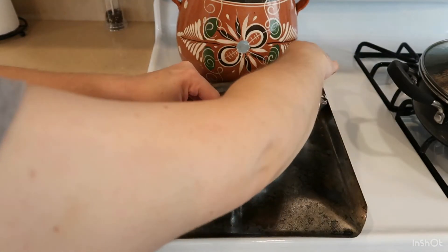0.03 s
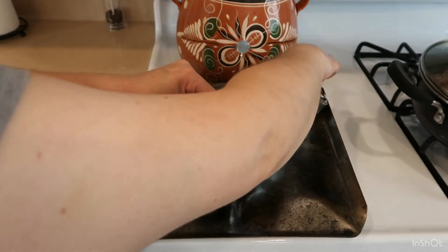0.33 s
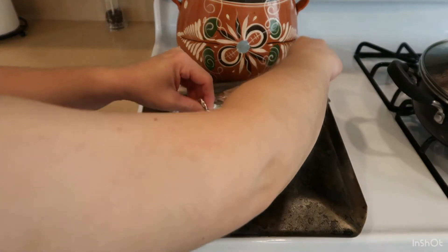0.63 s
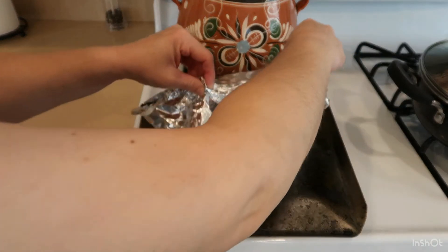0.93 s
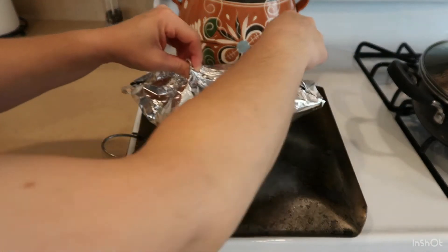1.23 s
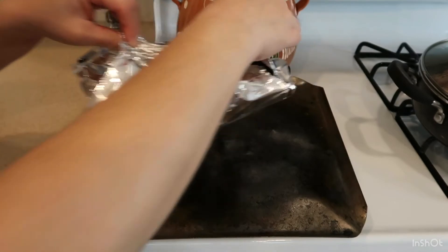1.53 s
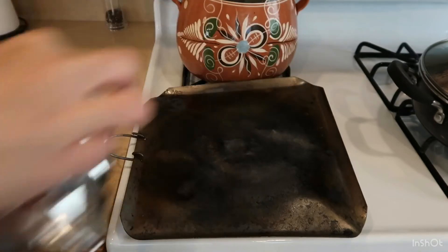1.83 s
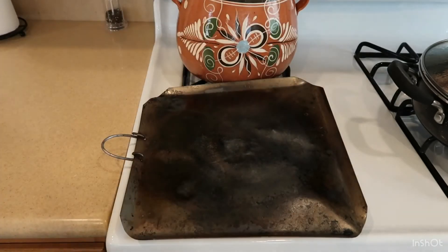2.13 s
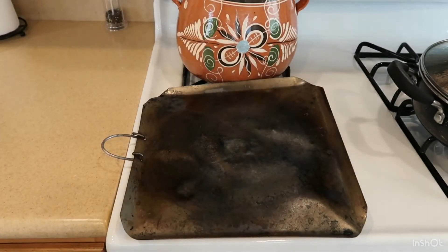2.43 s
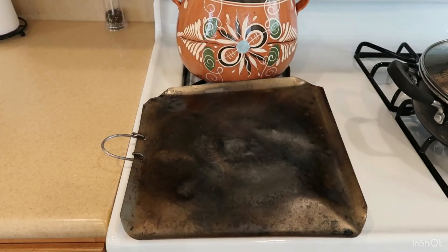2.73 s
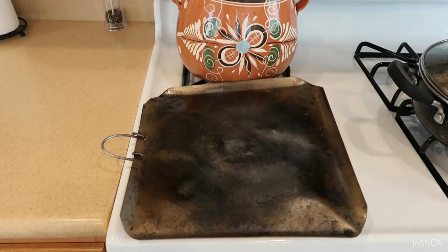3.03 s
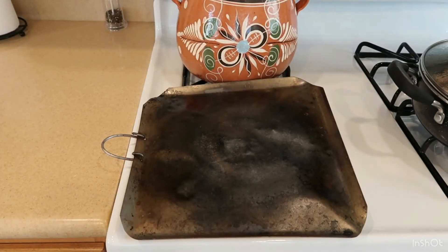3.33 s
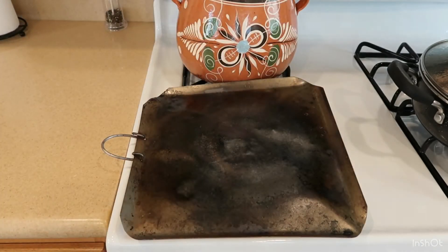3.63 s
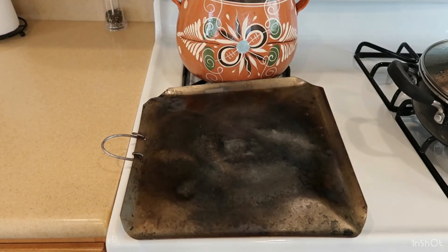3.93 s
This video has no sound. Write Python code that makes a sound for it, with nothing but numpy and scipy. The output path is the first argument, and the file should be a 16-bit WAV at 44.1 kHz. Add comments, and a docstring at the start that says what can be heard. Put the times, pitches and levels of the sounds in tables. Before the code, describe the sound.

Aluminium foil crackles and snaps close to the microphone as it is peeled off a griddle. It ticks lightly while carried aside, then rustles further off with a soft knock and a dull scrape. A kitchen appliance hums faintly throughout.

```python
"""A kitchen appliance hums from the start, and two close microphone ports pick up the scene.
For 1.75 s a crumpled sheet of aluminium foil is peeled off a griddle: its creases buckle in single
snaps over a dense crackle of tiny facets, and near 0.5 s a fold collapses. The sheet is then carried
aside, ticking lightly, and shivers after a jolt at 2.4 s. From 3 s it rustles further off, where the
room's reverberation is stronger, with a soft knock, one more tick and a dull scrape."""
import sys
import numpy as np
from scipy import signal
from scipy.fft import rfft, irfft, next_fast_len
from scipy.io import wavfile
from scipy.ndimage import map_coordinates

SR = 44100
rng = np.random.default_rng(int(sys.argv[2]) if len(sys.argv) > 2 else 0)


def master_out(mix):
    """Clip the mix to full scale and print it as 16-bit PCM to the path in sys.argv[1]."""
    frames = np.transpose(np.atleast_2d(mix))
    ceiling = np.clip(frames, -1, 1)
    pcm = np.round(ceiling * 32767).astype(np.int16)
    wavfile.write(sys.argv[1], SR, pcm)


N = 176400

# Harmonics of the appliance's mains and motor: harmonic number, relative level/dB
MAINS_HARMONICS = [(1, -71), (2, -44.5), (3, -51.5), (4, -48.5), (5, -53.5), (6, -55), (7, -60.5)]
MOTOR_HARMONICS = [(3, -49.5), (4, -49), (5, -52), (7, -60.5), (8, -59)]
# Spectrum of its air noise: f/Hz, relative level/dB
AIR_SPECTRUM = [(20, -7.5), (70, 0.5), (200, 2), (330, -1), (480, -3), (650, -11), (1200, -10.5),
                (1600, -19), (3000, -22.5), (6000, -31.5), (12000, -41), (15500, -54)]
# Stereo width of the air noise and of the echoes: f/Hz, side over mid/dB (before offset and cap)
AIR_WIDTH = [(60, -54), (130, -31), (300, -14), (800, -12), (1200, -14.5), (1800, -6.5), (3500, -4),
             (6000, 11), (12000, 14)]
ECHO_WIDTH = [(100, -26), (500, -17), (1200, -21), (1900, -22), (3000, -12), (5000, -5), (8000, 0),
              (14000, 3)]
# Direct sound at the two ports: f/Hz, phase lead of the left/rad
PORT_PHASE = [(100, 0), (4500, -.05), (7500, -.3), (10000, -1.1), (13500, -2.7), (16000, -3.2)]
# Reverberation time of the kitchen: f/Hz, T60/s
KITCHEN_T60 = [(200, 1), (1000, 0.31), (3500, 0.55), (8000, 0.55), (15000, 0.064)]
# Modes of the soft knock: f/Hz, relative level/dB, T60/s
KNOCK_MODES = [(954, -1, 0.054), (1014, 0.5, 0.066), (1518, -12, 0.17), (3444, -14, .2)]
# Envelopes of the flexing foil: t/s, relative level/dB
PEEL_ENVELOPE = [(0, -37.5), (.068, -41.5), (.1, -41), (.155, -45), (.2, -38.5), (.255, -37), (.33, -47.5),
                 (.41, -39), (.47, -37), (.65, -38), (.69, -39), (.82, -37.5), (.88, -40.5), (.95, -40),
                 (1.04, -41.5), (1.23, -39.5), (1.34, -46), (1.43, -45), (1.58, -50), (1.75, -58)]  # on the griddle
CRUNCH_ENVELOPE = [(.49, -49), (.506, -33), (.515, -27), (.527, -35), (.555, -48)]  # a fold collapses
CARRY_ENVELOPE = [(1.75, -53), (1.79, -54), (1.825, -40), (1.86, -54), (1.93, -58), (1.98, -51),
                  (2.05, -53), (2.12, -50.5), (2.24, -58), (2.39, -49.5), (2.6, -61.5), (2.74, -51),
                  (2.88, -67), (3.05, -53)]
RUSTLE_ENVELOPE = [(3.05, -58), (3.13, -49.5), (3.21, -51.5), (3.25, -46.5), (3.37, -54.5), (3.41, -39.5),
                   (3.55, -41), (3.62, -46), (3.75, -47.5), (3.82, -57.5), (4, -81)]  # further off
SCRAPE_ENVELOPE = [(3.45, -61), (3.55, -40.5), (3.6, -50), (3.635, -38), (3.7, -49), (3.78, -50),
                   (3.82, -62)]
# Spectra of the flexing foil: f/Hz, relative level/dB
PEEL_SPECTRUM = [(100, -47), (400, -1), (900, -0.5), (2300, -2.5), (4000, -7.5), (6000, -11), (9000, -17.5),
                 (12000, -15), (15500, -26)]
CRUNCH_SPECTRUM = [(100, -20), (600, -4), (1150, 6.5), (1600, -6), (2350, 3), (3600, -3), (6000, -10.5),
                   (9000, -17), (12000, -12), (15500, -28)]
CARRY_SPECTRUM = [(100, -22), (400, 4), (1500, -0.5), (2900, -2.5), (4200, -6), (5500, -7), (9000, -16.5),
                  (12000, -13.5), (15500, -25)]
SHIVER_SPECTRUM = [(400, -12), (3000, 0), (4500, 1), (5500, -14), (12500, -9), (15500, -32)]
RUSTLE_SPECTRUM = [(100, -30), (400, 3), (1700, 1), (4000, -4), (9000, -12.5), (12000, -14.5), (15500, -34)]
SCRAPE_SPECTRUM = [(100, -11), (500, -20), (1100, 3), (1900, -2), (2800, -7.5), (4500, -12.5), (8000, -25),
                   (15500, -40)]
CRACK_SPECTRUM = [(100, -39), (400, -6.5), (900, -4.5), (2300, 4.5), (4000, 1), (7000, -4), (12000, -5.5),
                  (15500, -10.5)]
# Click clusters of a running crease: t/s, first click's level/dB, median f/Hz
CRINKLES = [(.229, -21.5, 4960), (.278, -25, 7100), (0.298, -26, 5500), (0.647, -24, 6350),
            (0.712, -34, 9000), (0.723, -38, 8000), (0.762, -28.5, 4960), (0.8018, -25, 7500),
            (0.821, -32, 10000), (.929, -35, 8000), (1.0333, -31.5, 8060), (1.066, -36, 6000),
            (1.1183, -25.5, 5070), (1.1615, -26.5, 7060), (1.2065, -29.5, 4440), (1.243, -30.5, 3170),
            (1.427, -39, 5530), (1.4377, -28.5, 6660)]
# Creases snapping on the griddle, and lighter ticks of the carried sheet:
# t/s, relative level/dB, facet f/Hz, relative treble/dB, ring over crack/dB, crack T60/s
SNAPS = [(0.077, -21.5, 1050, -20, -11, 0.023), (0.1222, -27.5, 3280, -8, 6, 0.028),
         (0.1768, -29, 1920, -26, -10, 0.03), (0.222, -26, 3050, 2, 2, 0.027),
         (0.2325, -24.5, 4400, -10, 3, 0.023), (0.246, -22, 3100, -13, -1, 0.034),
         (0.2912, -21, 2220, -16, -2.5, 0.025), (0.3671, -29, 2400, -41, 1, 0.025),
         (0.4354, -21.5, 760, -25, -3, 0.041), (0.4614, -27, 2790, -26, 0, 0.031),
         (0.5125, -21, 2280, -20, -10, 0.023), (0.5712, -21.5, 3465, -8, 4, 0.032),
         (0.7207, -24.5, 1390, -19, -7, 0.025), (0.7988, -24.5, 2800, -24, -3, 0.034),
         (0.841, -26, 3610, -45, -2, 0.025), (0.9114, -26, 1170, -30, -7, 0.049),
         (0.954, -26, 1680, -55, 4, 0.006), (1.0927, -26.5, 1410, -16, 10, 0.021),
         (1.136, -25, 1850, -14, 0.5, 0.035), (1.1836, -29.5, 2540, -28, -3, 0.025),
         (1.3843, -32.5, 1900, -52, -8, 0.029), (1.4161, -30, 1060, -25, -7, 0.061)]
TICKS = [(1.816, -36, 3500, -25, -14, .02), (1.8688, -27.5, 4230, -24, -5, 0.0071),
         (1.9032, -27, 4900, -8, -24, 0.034), (1.9765, -26.5, 1890, -20, 1.5, 0.022),
         (2.021, -30.5, 960, -42, 5, 0.014), (2.0755, -33, 3660, -30, -1, 0.0051),
         (2.365, -33, 3500, -25, -1, .02), (2.409, -23.5, 3200, -14, 1, 0.0043),
         (3.399, -29.5, 1980, 2, -9, 0.015)]

TOP_HZ = 15600


def amp(db):
    """Amplitude ratio of a level in decibels."""
    return 10 ** (np.asarray(db) / 20)


def unit(x):
    """Normalisation to rms 1."""
    return x / np.sqrt(np.mean(x ** 2) + 1e-20)


def along(points, hz):
    """Interpolation of (f/Hz, value) points on a logarithmic frequency axis."""
    f, v = np.transpose(points)
    return np.interp(np.log(hz + 1), np.log(f + 1), v)


def wobble(rate):
    """Smooth random modulation: a spline through `rate` Gaussian knots a second."""
    return map_coordinates(rng.standard_normal(400), [np.arange(N) * rate / SR], mode="wrap")


def filtered(x, response):
    """Linear filtering: the spectrum is multiplied by a frequency response."""
    n = x.shape[-1]
    m = next_fast_len(n + 4096)
    return irfft(rfft(x, m) * response(np.fft.rfftfreq(m, 1 / SR)), m)[..., :n]


def coloured(x, db_at, size=1024):
    """Minimum-phase filtering: the response is causal, so attacks stay sharp."""
    cepstrum = irfft(db_at(np.fft.rfftfreq(size, 1 / SR)) * np.log(10) / 20)
    cepstrum[1:size // 2] *= 2
    cepstrum[size // 2 + 1:] = 0
    return signal.fftconvolve(x, irfft(np.exp(rfft(cepstrum))))[:len(x)]


def diffuse(pair, width, wider_db=0):
    """Diffuse field: coherence between the two ports is lower in the treble."""
    angle = lambda hz: np.arctan(amp(np.minimum(along(width, hz) + wider_db, 3)))
    mid, side = filtered(pair, lambda hz: np.array([np.cos(angle(hz)), np.sin(angle(hz))]))
    return np.array([mid + side, mid - side])


def appliance(mains_hz=59.95, motor_hz=85.2, whine_hz=492.5):
    """Line spectrum over broadband noise: wavering harmonics and a whine above a steady rush of air."""
    t = np.arange(N) / SR
    lines = [(k * mains_hz, db) for k, db in MAINS_HARMONICS]
    lines += [(k * motor_hz, db) for k, db in MOTOR_HARMONICS] + [(whine_hz, -52)]
    hum = np.zeros(N)
    for hz, db in lines:
        level = amp(db + 2 * wobble(6.795))
        hum += level * np.sin(2 * np.pi * (hz * t + rng.random()) + 0.71 * wobble(6.11))
    air = filtered(rng.standard_normal((2, N)), lambda hz: amp(along(AIR_SPECTRUM, hz)))
    return amp(0.5) * hum + amp(-42) * unit(diffuse(air, AIR_WIDTH))


def kitchen(x, tail_db, wider_db, early_db=-2, early_t60=0.03, gap_s=0.0007):
    """Superposition of direct sound, early reflections from stove top and wall, and reverberation."""
    out = np.zeros((2, N + SR))
    out[:, :N] = filtered(x, lambda hz: np.exp(.5j * np.outer([1, -1], along(PORT_PHASE, hz))))
    for block in np.array_split(np.arange(N), 40):  # the foil moves: new random echoes every 0.1 s
        if not x[block].any():
            continue
        hz, t, noise = signal.stft(rng.standard_normal((2, 14000)), SR, nperseg=256)
        decay = amp(-60 * t / along(KITCHEN_T60, hz)[:, None])
        tail = signal.istft(noise * decay, SR, nperseg=256)[1]
        t = np.arange(tail.shape[1]) / SR
        early = rng.standard_normal(tail.shape) * amp(-60 * t / early_t60)
        echoes = (amp(tail_db) * unit(tail) + amp(early_db) * unit(early)) * (t > gap_s)
        response = diffuse(echoes, ECHO_WIDTH, wider_db) / np.sqrt(len(t))
        reflected = signal.fftconvolve(x[block][None], response, axes=1)
        out[:, block[0]:block[0] + reflected.shape[1]] += reflected
    return out[:, :N]


def knock(start_s=3.236, attack_s=0.00059):
    """Damped free vibration: a soft contact excites a few modes, with no crack."""
    t = np.maximum(np.arange(N) / SR - start_s, 0)
    ring = sum(np.sin(2 * np.pi * hz * t) * amp(db - 60 * t / t60) for hz, db, t60 in KNOCK_MODES)
    return amp(-36.5) * ring * (1 - np.exp(-t / attack_s))


def crackle(envelope, spectrum, per_s, scatter_db, clump_db, rub_db, gain_db):
    """Shot noise and friction: tiny facets buckle at random times over a rub of foil on foil."""
    facets, median_hz, log_spread, decay_cycles = 12000, 2885, 0.84, 10.2
    when, chance, pick = rng.random((3, facets))
    pitches = np.clip(median_hz * np.exp(log_spread * rng.standard_normal(facets)), TOP_HZ / 10, TOP_HZ)
    buckles = pick < per_s * N / SR / facets
    t = np.arange(SR // 100) / SR
    cycles = pitches[buckles, None] * t
    strength = amp(scatter_db * np.minimum(-np.log(chance[buckles, None]), np.pi))
    grains = strength * np.cos(2 * np.pi * cycles) * amp(-60 * cycles / decay_cycles)
    grains *= np.sqrt(pitches[buckles, None])  # energy independent of pitch
    at = (when[buckles, None] * N).astype(int) + np.arange(len(t))
    clicks = np.bincount(at.ravel(), grains.ravel(), N + len(t))[:N]
    f, power = signal.welch(clicks, SR, nperseg=128)
    whitening_db = lambda hz: -10 * np.log10(np.interp(hz, f[1:], power[1:]))
    clicks = unit(coloured(clicks, lambda hz: along(spectrum, hz) + whitening_db(hz)))
    rub = unit(filtered(rng.standard_normal(N), lambda hz: amp(along(spectrum, hz))))
    times, db = np.transpose(envelope)
    level = np.interp(np.arange(N) / SR, times, amp(db + gain_db), left=0, right=0)
    clumps = amp(clump_db * wobble(70))
    return level * unit((clicks + amp(rub_db) * rub) * clumps)


def shiver(start_s=2.41, t60=0.39):
    """Exponential decay: after a jolt the whole sheet rustles and dies away."""
    fade = [(start_s + u * t60, -60 * u) for u in np.linspace(0, 1, 20)]
    return crackle(fade, SHIVER_SPECTRUM, per_s=2400, scatter_db=-1, clump_db=0, rub_db=1, gain_db=-41.5)


def crinkles(count=10, mean_gap_s=0.0014, loss_db=1.1, log_spread=0.21, decay_cycles=9.8):
    """Buckling cascade: tiny facets flip one after another, each weaker than the last."""
    out, t = np.zeros(N + SR), np.arange(SR // 200) / SR
    for start, db, hz in CRINKLES:
        gaps = rng.exponential(mean_gap_s, count)
        pitches = hz * np.exp(log_spread * rng.standard_normal(count))
        for k, (delay, pitch) in enumerate(zip(np.cumsum(gaps) - gaps[0], pitches)):
            level = amp(db - loss_db * k - 60 * pitch * t / decay_cycles)
            out[round((start + delay) * SR):][:len(t)] += level * np.sin(2 * np.pi * pitch * t)
    return out[:N]


def snaps(creases, gain_db, mode_count=7, log_spread=0.0756, shelf_hz=5630, attack_s=0.0006):
    """Snap-through buckling: a crease cracks and excites close modes of the facet beside it."""
    out, t = np.zeros(N + SR), np.arange(SR // 10) / SR
    for start, db, hz, treble_db, ring_db, crack_t60 in creases:
        shelf = lambda f: (treble_db + 15) * f ** 2 / (f ** 2 + shelf_hz ** 2)  # flat at treble -15 dB
        burst = rng.standard_normal(len(t)) * amp(-60 * t / crack_t60)
        crack = coloured(burst, lambda f: along(CRACK_SPECTRUM, f) + shelf(f))
        modes = hz * np.exp(log_spread * rng.standard_normal((mode_count, 1)))
        ring = np.sin(2 * np.pi * (modes * t + rng.random((mode_count, 1)))).sum(0)
        ring *= amp(-60 * t / (1.3 * crack_t60)) * (1 - np.exp(-t / attack_s))  # outlasts the crack
        snap = unit(unit(crack) + amp(ring_db) * unit(ring))
        out[round(start * SR):][:len(t)] += amp(db + gain_db) * snap
    return out[:N]


def scene():
    """The direct-to-reverberant ratio falls with distance: foil near, carried, then aside, over the hum."""
    peel = crackle(PEEL_ENVELOPE, PEEL_SPECTRUM,
                   per_s=900, scatter_db=3.5, clump_db=2.4, rub_db=1, gain_db=-2.5)
    crunch = crackle(CRUNCH_ENVELOPE, CRUNCH_SPECTRUM,
                     per_s=4600, scatter_db=4.5, clump_db=1.5, rub_db=2, gain_db=-1)
    carry = crackle(CARRY_ENVELOPE, CARRY_SPECTRUM,
                    per_s=1400, scatter_db=0, clump_db=1.9, rub_db=6.5, gain_db=-2.5)
    rustle = crackle(RUSTLE_ENVELOPE, RUSTLE_SPECTRUM,
                     per_s=1300, scatter_db=5, clump_db=1, rub_db=-1.5, gain_db=-3)
    scrape = crackle(SCRAPE_ENVELOPE, SCRAPE_SPECTRUM,
                     per_s=1500, scatter_db=6, clump_db=1, rub_db=-6, gain_db=-4)
    near = kitchen(peel + crunch + crinkles() + snaps(SNAPS, gain_db=-22.5), tail_db=-6.5, wider_db=-2)
    carried = kitchen(carry + shiver() + snaps(TICKS, gain_db=-24), tail_db=-4.5, wider_db=13.5)
    aside = kitchen(rustle + scrape + knock(), tail_db=-1, wider_db=3.5)
    return near + carried + aside + appliance()


def record(dry):
    """Band limiting: an ideal low-pass filter cuts off at TOP_HZ."""
    return filtered(dry, lambda hz: hz < TOP_HZ)


dry = scene()
out = record(dry)
master_out(out)
```